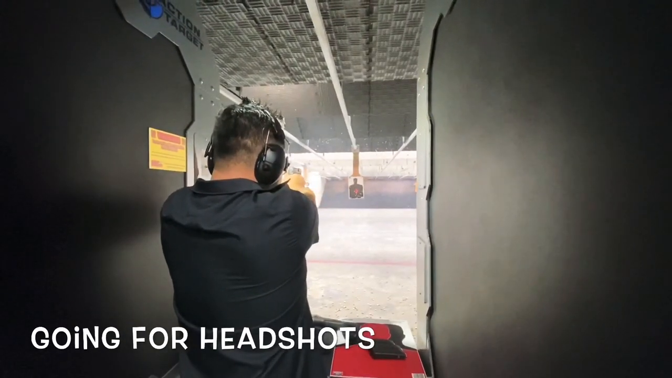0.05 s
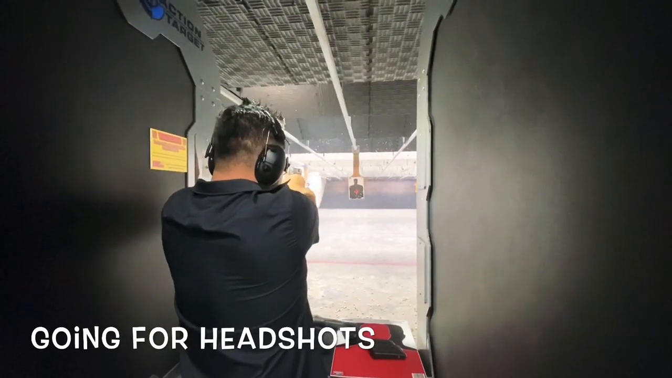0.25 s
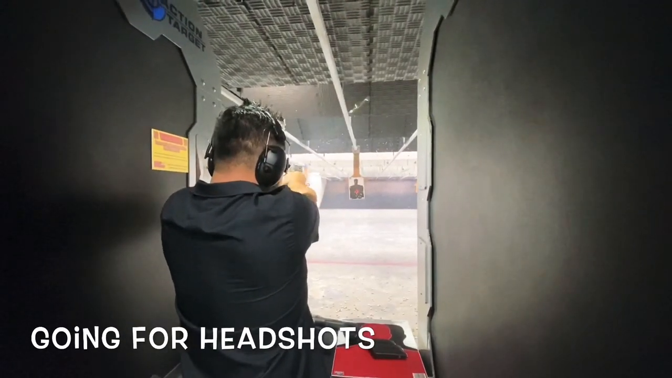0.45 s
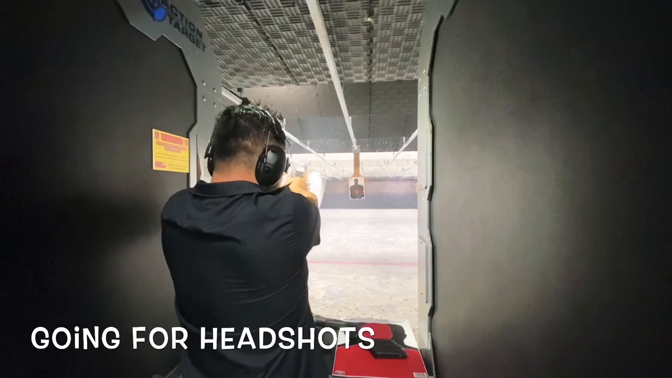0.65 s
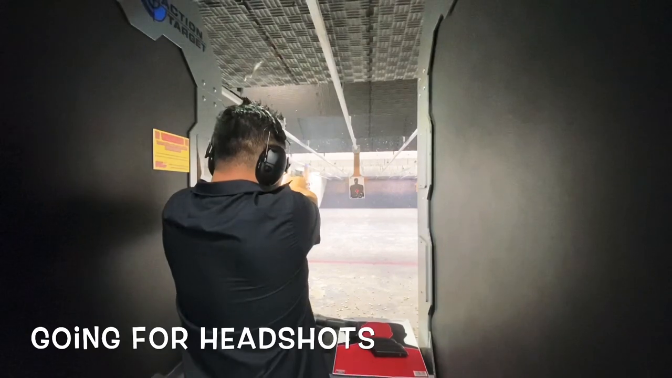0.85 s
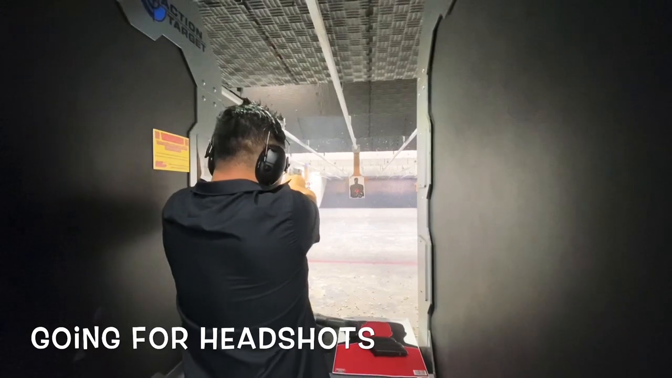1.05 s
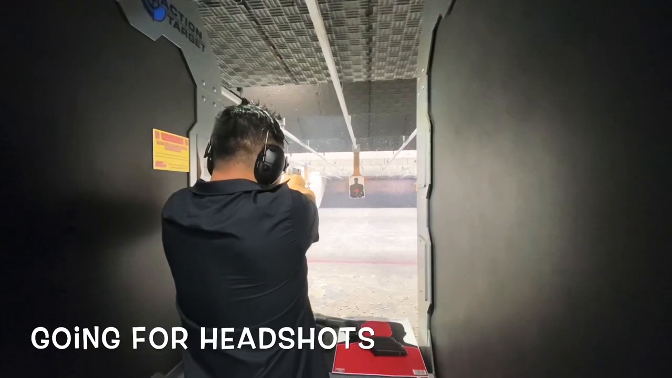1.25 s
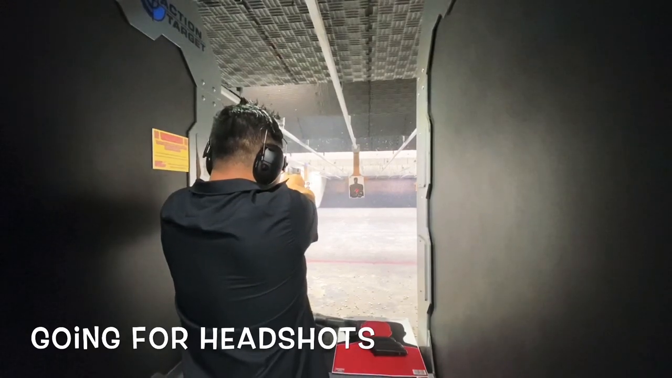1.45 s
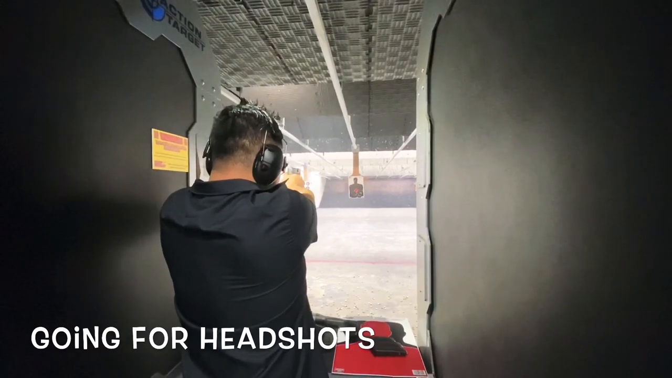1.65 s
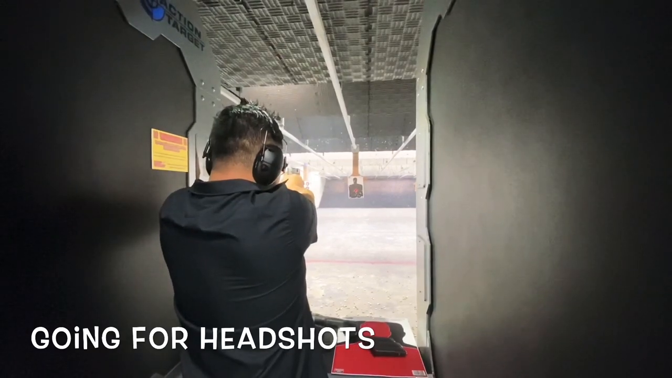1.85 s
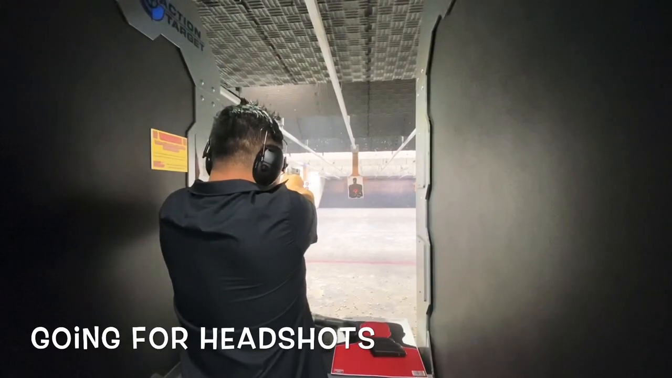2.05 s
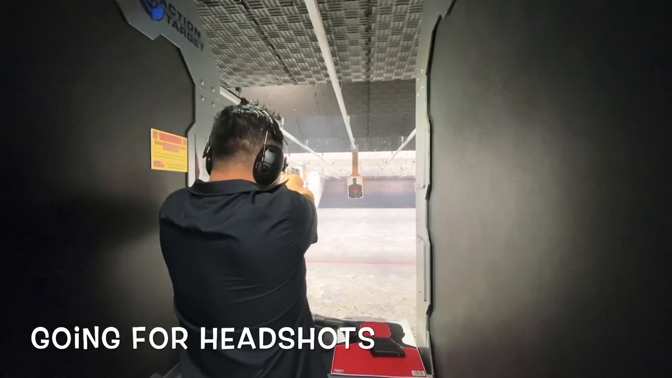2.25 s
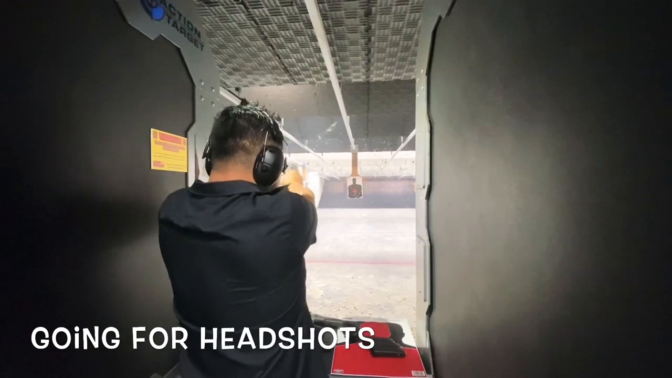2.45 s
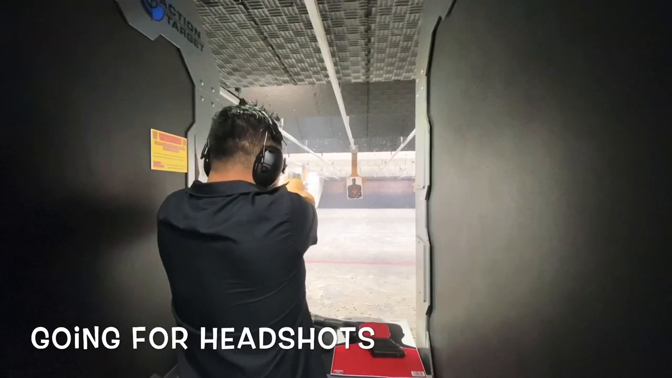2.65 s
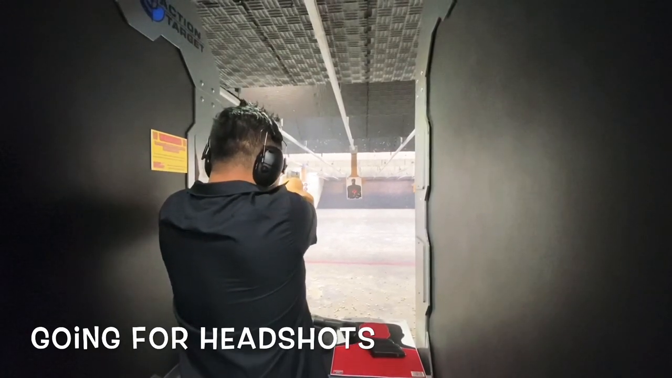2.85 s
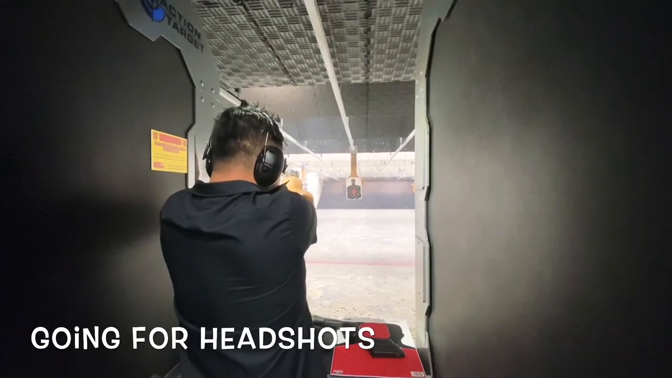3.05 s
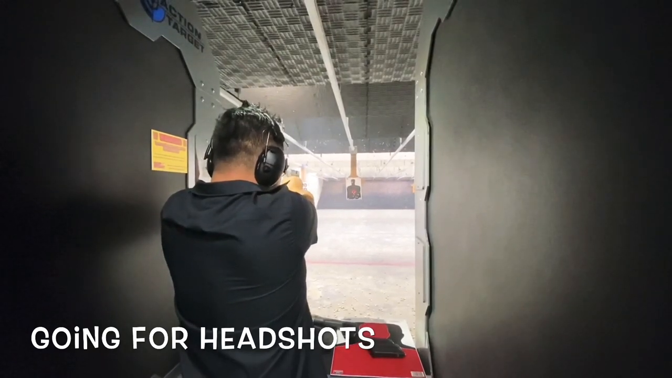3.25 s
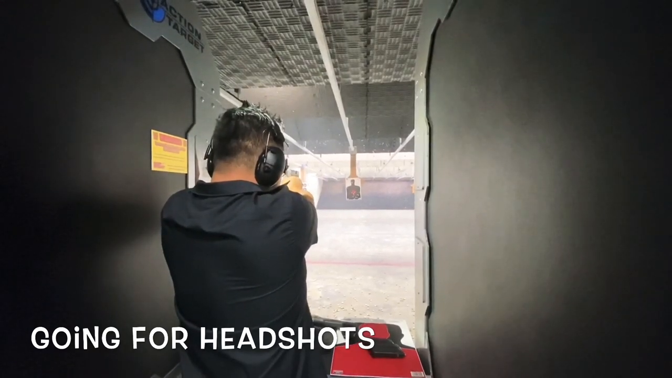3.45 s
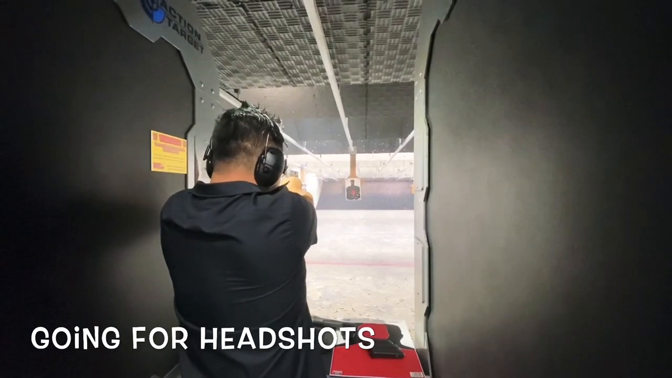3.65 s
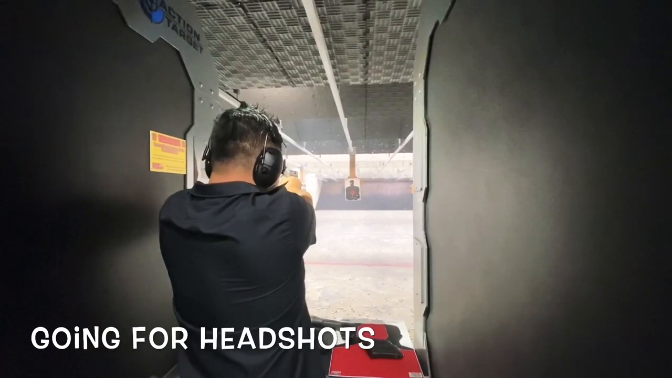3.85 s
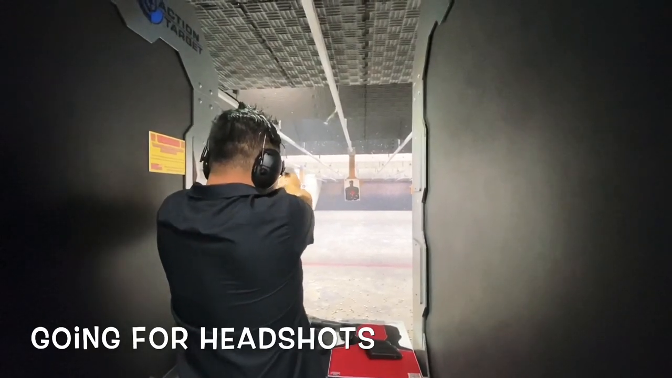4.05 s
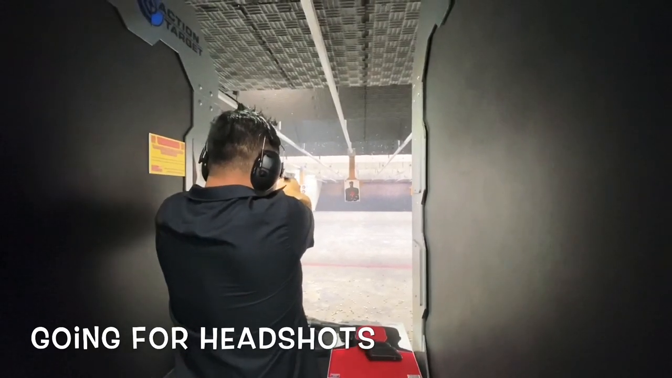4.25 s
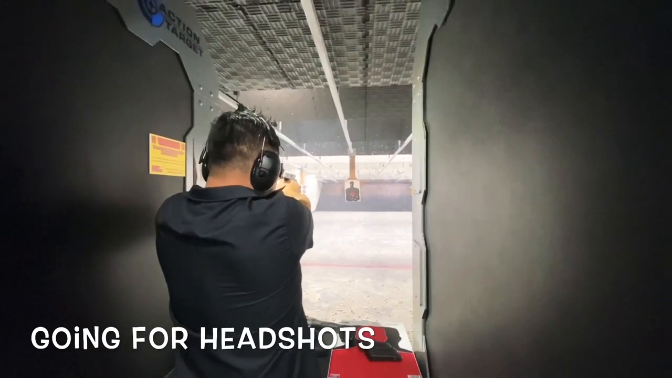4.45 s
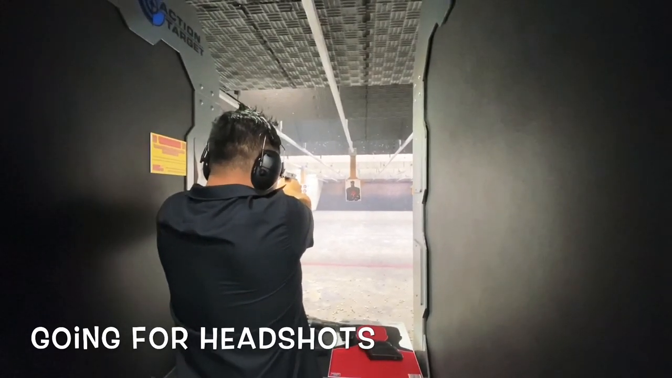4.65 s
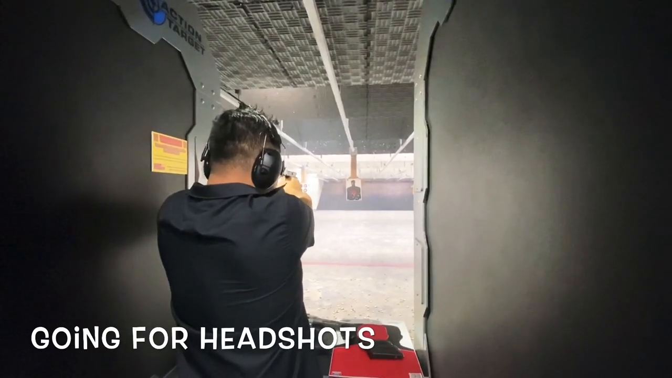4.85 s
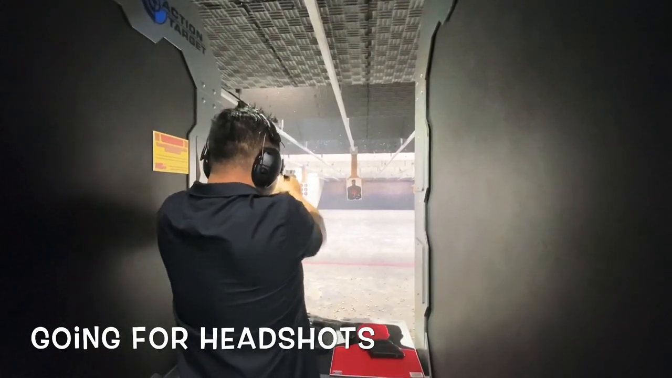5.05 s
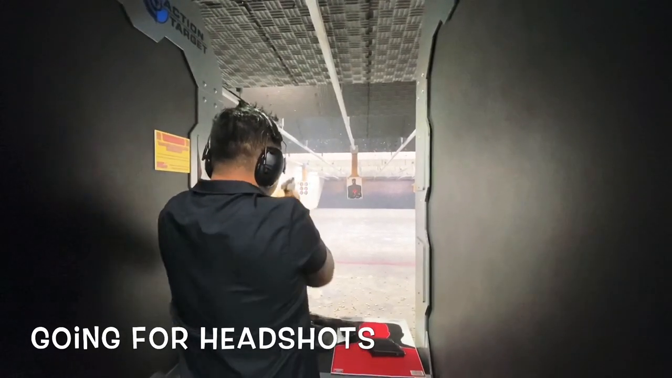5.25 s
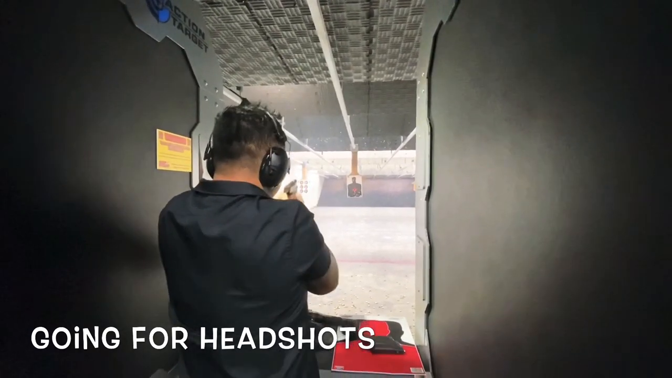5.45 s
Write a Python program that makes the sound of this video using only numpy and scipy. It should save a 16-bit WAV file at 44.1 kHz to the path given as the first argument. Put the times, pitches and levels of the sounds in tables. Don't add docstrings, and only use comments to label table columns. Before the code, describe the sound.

Two handguns in neighbouring lanes fire a spaced pair, a tight pair and a lone last shot in a long concrete hall. Each blast is thick, boomy and compressed, preceded by a slight floor thump and followed by a slowly darkening echo. Spent cases click and ring thinly between shots above a quiet fan rumble. The handheld stereo microphone, close behind the booths, limits the peaks.

```python
import sys
import numpy as np
from scipy import signal
from scipy.fft import rfft, irfft, next_fast_len
from scipy.io import wavfile
from scipy.ndimage import uniform_filter1d

SR = 44100
rng = np.random.default_rng(int(sys.argv[2]) if len(sys.argv) > 2 else 0)


def inscribe(sig):
    pcm = np.round(np.clip(np.atleast_2d(sig).T, -1, 1) * 32767)
    wavfile.write(sys.argv[1], SR, pcm.astype(np.int16))


def ratio_of_db(decibels):
    return 10 ** (np.asarray(decibels, float) / 20)


N = 243431


def unit(x):
    return x / np.sqrt(np.mean(x ** 2) + 1e-20)


def at_hz(table, hz, axis=1):
    table = np.array(table)
    return np.interp(np.log(np.maximum(hz, 1)), np.log(table[:, 0]), table[:, axis])


def field(spectrum, peaks, size, lean):
    # frequency in Hz, left minus right in dB.
    left_extra = [(30, 6), (100, 3), (300, 2), (800, 4), (2400, 5), (4400, 7), (8000, 1), (13000, 1)]
    # frequency in Hz, share of the power (0 to 1).
    along_share = [(30, 0.18), (60, .2), (130, 0.41), (300, 0.71), (800, 0.34), (1500, .45), (4000, 0.067),
                   (10000, 0.033)]
    lag_ahead_s, lag_behind_s = .00047, .00043

    hz = np.fft.rfftfreq(size, 1 / SR)
    db = at_hz(spectrum, hz)
    for peak_hz, wide_hz, peak_db in peaks:
        db = db + peak_db / (1 + (2 * (hz - peak_hz) / wide_hz) ** 2)

    ahead, behind, left, right = rfft(rng.standard_normal((4, size)))
    late_ahead = ahead * np.exp(-2j * np.pi * hz * lag_ahead_s)
    late_behind = behind * np.exp(-2j * np.pi * hz * lag_behind_s)
    share = np.clip(at_hz(along_share, hz), 0, 1)
    along = np.array([late_ahead + behind, ahead + late_behind]) * np.sqrt(share / 2)
    around = np.array([left, right]) * np.sqrt(1 - share)
    pair = (along + around) * ratio_of_db(db)
    pair = pair * ratio_of_db(np.outer([lean / 2, -lean / 2], at_hz(left_extra, hz)))
    return hz, pair / np.sqrt(np.mean(irfft(pair, size) ** 2))


def ventilation():
    # frequency in Hz, level in dB per Hz.
    air_colour = [(15, -28), (30, -7.5), (70, 0.5), (125, -6), (190, -13), (300, -8), (420, -13.5),
                  (540, -14), (800, -6), (1050, -15.5), (1500, -29), (2200, -27), (2800, -35.5),
                  (15000, -63)]
    hums = [(295, 12, 8.9), (398, 15, 4)]
    size = next_fast_len(N)
    _, pair = field(air_colour, hums, size, lean=0.46)
    return ratio_of_db(-60.5) * irfft(pair, size)[:, :N]


def case_ticks():
    # start in seconds, level in dB, centre frequency in Hz.
    landings = [(1.040, -40, 4750), (1.473, -72, 10000), (1.915, -73, 5500), (1.970, -75, 5500),
                (2.156, -65.5, 3780), (3.3862, -55.5, 3400), (3.626, -78, 5020), (3.799, -68.5, 4000),
                (3.8483, -50, 2710), (4.951, -72, 7000), (5.093, -65, 6100)]
    band_ratio = 1.65
    tick_t60_s, room_t60_s, room_db = 0.016, 0.28, -14
    knock_db, knock_cycles = 6, 14

    out = np.zeros((2, N + SR))
    t = np.arange(SR // 2) / SR
    for s, db, hz in landings:
        edges_hz = [hz / band_ratio, min(hz * band_ratio, 15000)]
        band = signal.butter(2, edges_hz, "band", fs=SR, output="sos")
        tick = unit(signal.sosfilt(band, rng.standard_normal((2, len(t)))))
        fade = ratio_of_db(-60 * t / tick_t60_s) + ratio_of_db(room_db - 60 * t / room_t60_s)
        knock = np.sin(2 * np.pi * hz * t) * ratio_of_db(knock_db - 60 * t * hz / knock_cycles)
        start = round(s * SR)
        out[:, start:start + len(t)] += ratio_of_db(db) * (tick * fade + knock)
    return out[:, :N]


def case_rings():
    # start in seconds, level in dB, frequency in Hz.
    chimes = [(0.099, -73, 10080), (2.995, -79, 10200), (3.387, -66, 10100), (3.625, -84, 10850),
              (3.802, -76.5, 10100), (3.8492, -74, 11070)]
    ring_t60_s, split_ratio = .24, 1.006
    short_ratio, short_db, short_t60_s = .873, 4, .022
    flutter = 0.88

    out = np.zeros((2, N + SR))
    t = np.arange(SR // 2) / SR
    for s, db, hz in chimes:
        turn = 2 * np.pi * hz * t
        pair = np.sin(turn) + 0.65 * np.sin(turn * split_ratio + rng.standard_normal((2, 1)))
        tumble = np.interp(t * 150, np.arange(128), rng.standard_normal(128))
        pair = pair * (1 + flutter * tumble)
        short = np.sin(turn * short_ratio) * ratio_of_db(short_db - 60 * t / short_t60_s)
        ring = (pair * ratio_of_db(-60 * t / ring_t60_s) + short) * (1 - np.exp(-t / .001))
        start = round(s * SR)
        out[:, start:start + len(t)] += ratio_of_db(db) * ring
    return out[:, :N]


def wall_returns(t, returns, period):
    spread_s = 0.71 / 1000 + 2.3 * period
    lumps_db = 0
    for path_m, db in returns:
        lumps_db = lumps_db + db * np.exp(-((t[:8192] - path_m / 343) / spread_s) ** 2)
    return np.pad(ratio_of_db(lumps_db), (0, len(t) - 8192), constant_values=1)


def floor_forerunner(t, centre, slab_db, slab_s):
    floor_db = -5.5 + slab_db - 5.5 * abs(centre - 10)
    swell = np.exp(np.minimum(t, 0) / .005)
    return ratio_of_db(floor_db) * swell * np.clip((t + slab_s) / .005, 0, 1)


def response(blast, booth, returns, build_cycles, slab_db, slab_s):
    # frequency in Hz, level in dB per Hz.
    hall_colour = [(24, -49.5), (87, -4), (180, -4.5), (300, -6.5), (520, -6), (750, 2.5), (1120, -7.5),
                   (2200, -13.5), (2700, -17.5), (6600, -21.5), (7400, -24.5), (11000, -26), (13200, -30),
                   (14600, -30)]
    # frequency in Hz, width in Hz, level in dB.
    hall_modes = [(93, 16, 5), (232, 20, 0.5), (319, 12, 7), (395, 56, 6), (502, 3.9, 2.5), (662, 27, 3.5),
                  (805, 15, -4.5), (999.4, 33, 5.5), (1235, 49, 6), (2046, 100, 6), (2510, 220, 2.5)]

    size, lead = 2 ** 17, 1024
    t = (np.arange(size) - lead) / SR
    after = np.maximum(t, 0)
    hz, early = field(blast, booth, size, lean=0.9)
    hz, late = field(hall_colour, hall_modes, size, lean=0.17)
    octave = np.log2(np.maximum(hz, 1))
    out = 0
    for centre in np.arange(5, 14.6, .5):
        mask = np.cos(np.pi * np.clip(octave - centre, -.5, .5)) ** 2
        period = 2. ** -centre
        khz = 1 / (1000 * period)

        rise = 1 - np.exp(-after / (.2 / 1000 + build_cycles * period))
        swell = rise * wall_returns(t, returns, period)
        fore = floor_forerunner(t, centre, slab_db, slab_s)

        booth_db_s = 60 / (0.22 + 33 * period)
        booth_fade = ratio_of_db(-booth_db_s * np.maximum(after - 0.021, 0))
        out = out + irfft(early * mask, size) * (swell + fore * (1 - rise)) * booth_fade

        hall_db_s = 60 / 1.643 + 0.88 * khz + 0.3371 * khz ** 2 + 400 * period
        clumps = np.interp(after * 22, np.arange(256), rng.standard_normal(256))
        clumps_db = 1.4 / (1 + khz / 3) * clumps
        out = out + irfft(late * mask, size) * swell * ratio_of_db(-11.5 + clumps_db - hall_db_s * after)
    return out, lead


def pistol(shots, echo, lead):
    out = np.zeros((2, N + echo.shape[1]))
    for s, db in shots:
        start = round(s * SR) - lead
        out[:, start:start + echo.shape[1]] += ratio_of_db(db - 5.5) * echo
    return out[:, :N]


def far_pistol():
    # start in seconds, blast level in dB.
    far_shots = [
        (.7050, -0.41),
        (2.2148, -0.23),
    ]
    # frequency in Hz, level in dB per Hz.
    far_blast = [(24, -44), (40, -16), (368, -2), (509, -2.5), (817, -6), (1020, -1), (2220, -22),
                 (2840, -22), (3470, -18.5), (10400, -28.5), (15500, -38)]
    # frequency in Hz, width in Hz, level in dB.
    far_booth = [(335, 410, -2.5), (1035, 98, 3.5), (1423, 28, 16), (2304, 480, 10.5), (3320, 730, 2)]
    # extra path in metres, level in dB.
    far_returns = [(1.2, 2.7), (3.6, 2.5), (6.9, 1.7), (13.0, 3.3)]
    echo, lead = response(far_blast, far_booth, far_returns, build_cycles=0.41, slab_db=0.1, slab_s=.018)
    return pistol(far_shots, echo, lead)


def near_pistol():
    # start in seconds, blast level in dB.
    near_shots = [
        (.3075, 1.5),
        (2.3392, 0),
        (3.9250, 0.5),
    ]
    # frequency in Hz, level in dB per Hz.
    near_blast = [(24, -66), (40, -9.5), (213, -6.5), (1050, -4), (1220, 1), (1490, -5.5), (1910, -15.5),
                  (2770, -10.5), (6320, -18), (14000, -28), (15500, -33.5)]
    # frequency in Hz, width in Hz, level in dB.
    near_booth = [(269.3, 200, 7), (394, 63, 4), (506, 50, 0.5), (674, 31, 7), (730, 120, 9), (1330, 19, 5),
                  (1890, 180, 13), (2401, 180, 9), (6700, 830, 7)]
    # extra path in metres, level in dB.
    near_returns = [(3.0, 4), (9.0, 5), (26.2, 3.5)]
    echo, lead = response(near_blast, near_booth, near_returns, build_cycles=2.2, slab_db=-7.5, slab_s=.017)
    return pistol(near_shots, echo, lead)


def scene():
    pistols = near_pistol() + far_pistol()
    return pistols + ventilation() + case_ticks() + case_rings()


def limiter(dry):
    ceiling_db, limit_share = -17.5, 0.6
    attack_s, release_db_s = 0.011, 38
    power = uniform_filter1d(np.mean(dry ** 2, axis=0), size=441)
    level_db = 10 * np.log10(power + 1e-12)
    over_db = limit_share * np.maximum(level_db - ceiling_db, 0)
    ramp = release_db_s * np.arange(N) / SR
    duck_db = np.maximum.accumulate(over_db + ramp) - ramp
    pole = np.exp(-1 / (attack_s * SR))
    return dry * ratio_of_db(-signal.lfilter([1 - pole], [1, -pole], duck_db))


def treble_colour(x):
    hz = np.fft.rfftfreq(N, 1 / SR)
    notch_db = -40 * np.exp(-((hz - 12150) / 540) ** 4)
    lift_db = 4 * np.exp(-((hz - 14100) / 900) ** 2)
    top_cut_db = np.maximum(hz - 15150, 0) / 10
    return irfft(rfft(x) * ratio_of_db(notch_db + lift_db - top_cut_db), N)


def top_cut(x):
    return signal.sosfilt(signal.butter(12, 15920, fs=SR, output="sos"), x)


def record(dry):
    rounded = np.tanh(limiter(dry))
    return top_cut(treble_colour(rounded))


dry = scene()
out = record(dry)
inscribe(out)
```